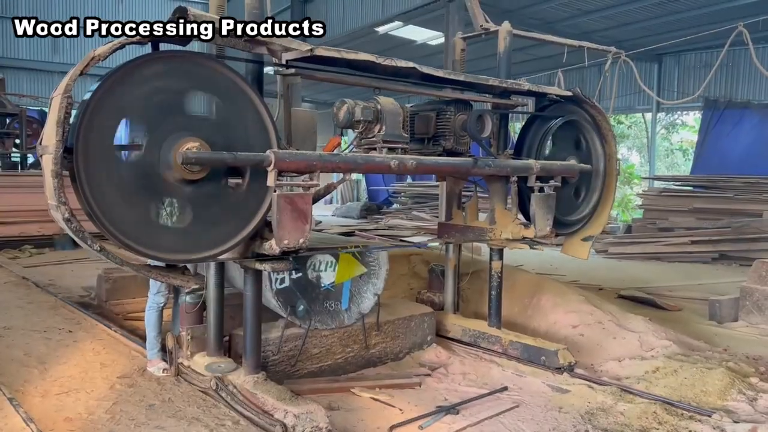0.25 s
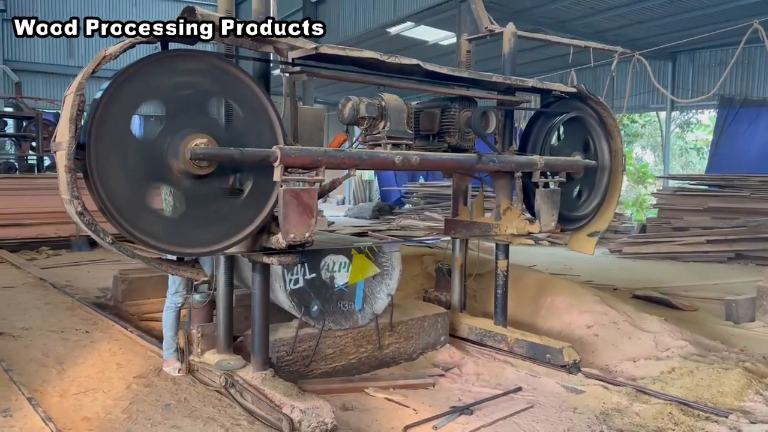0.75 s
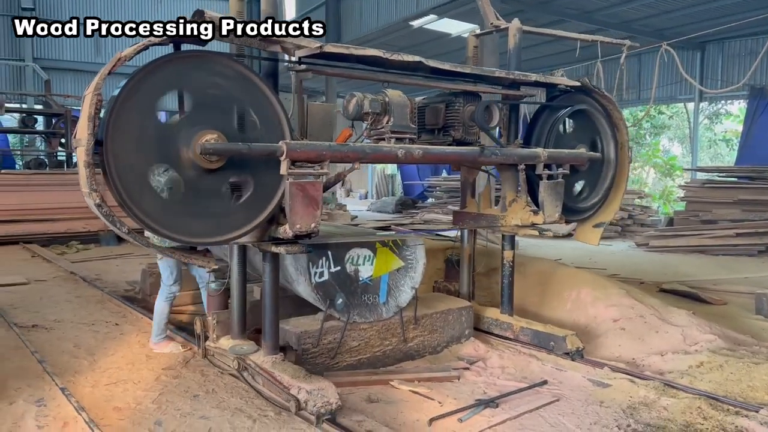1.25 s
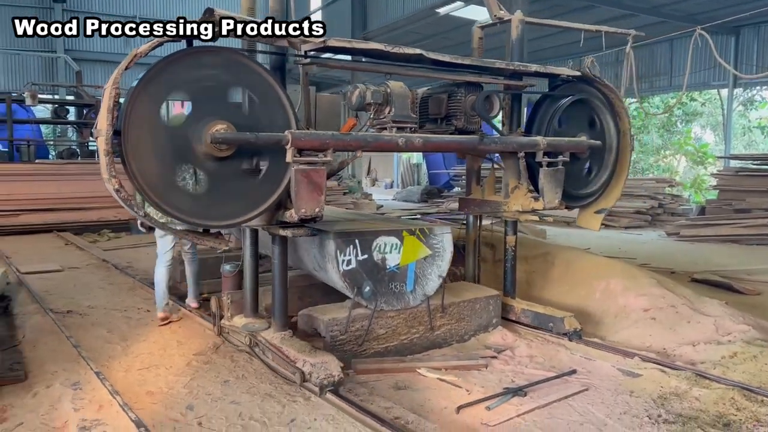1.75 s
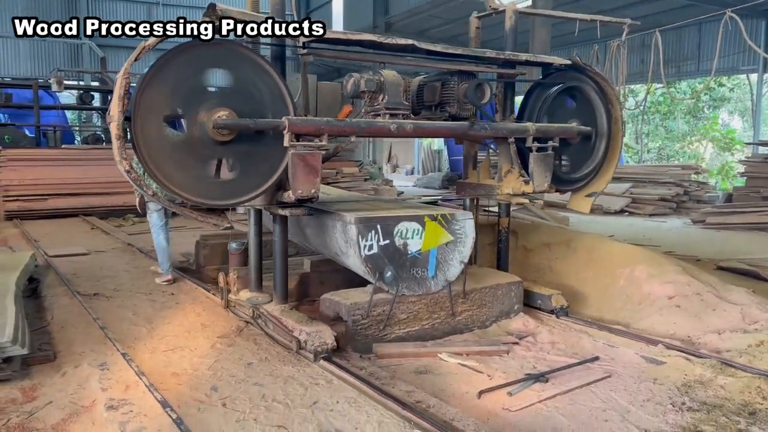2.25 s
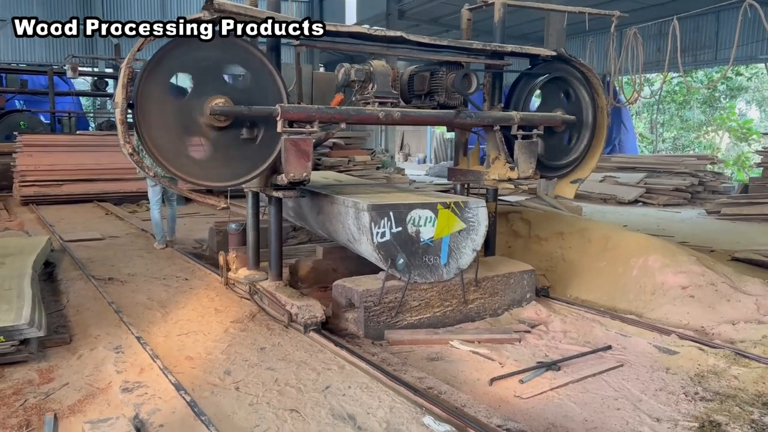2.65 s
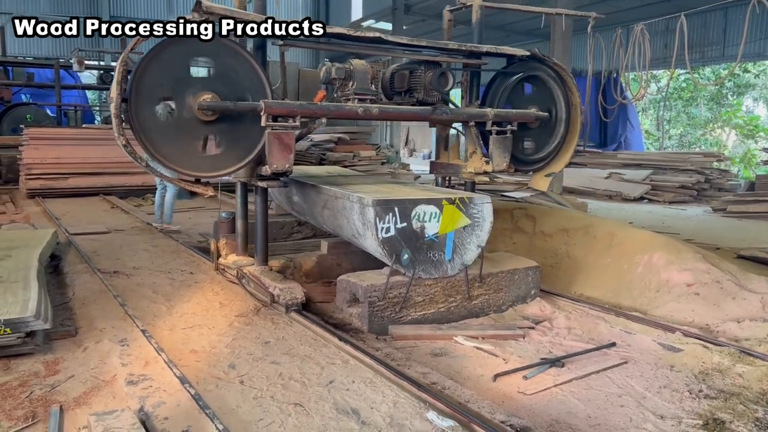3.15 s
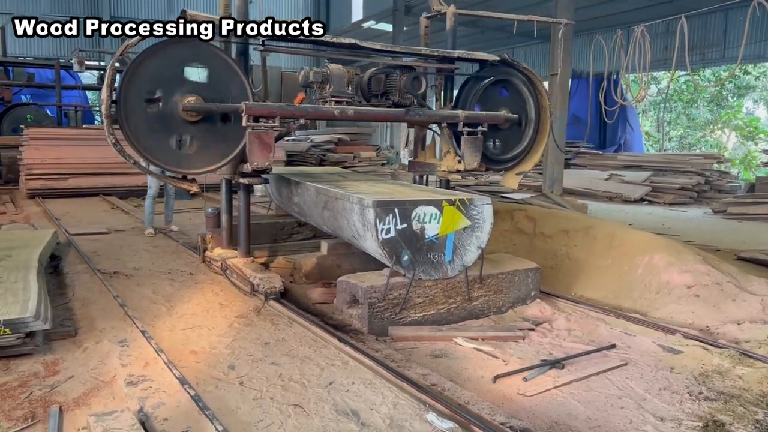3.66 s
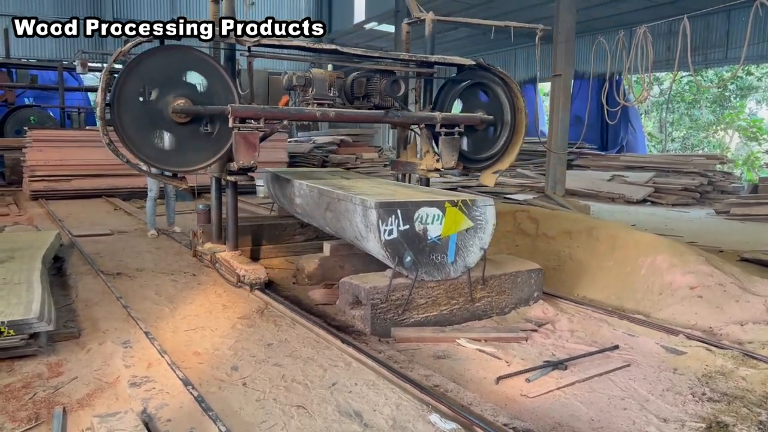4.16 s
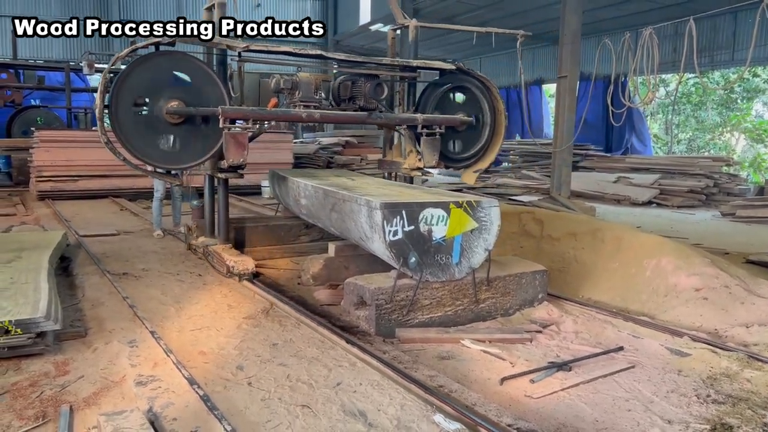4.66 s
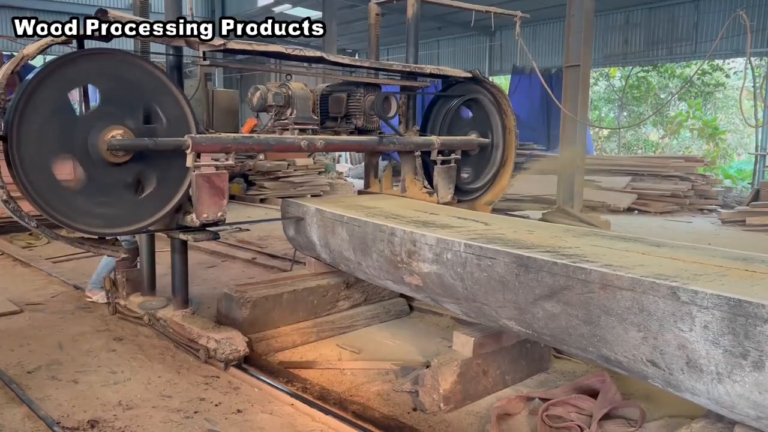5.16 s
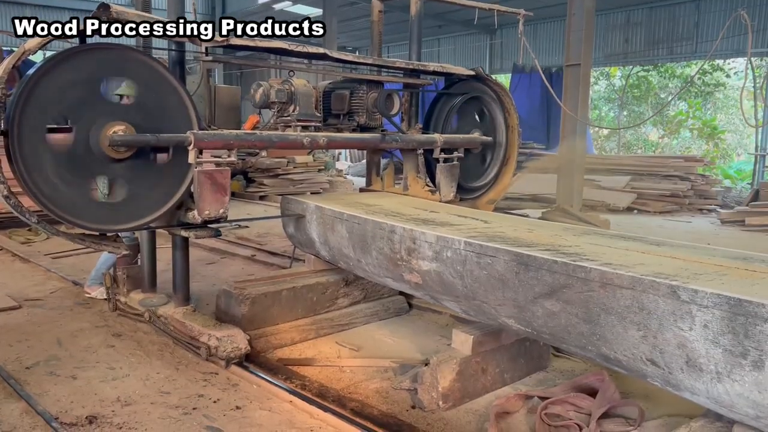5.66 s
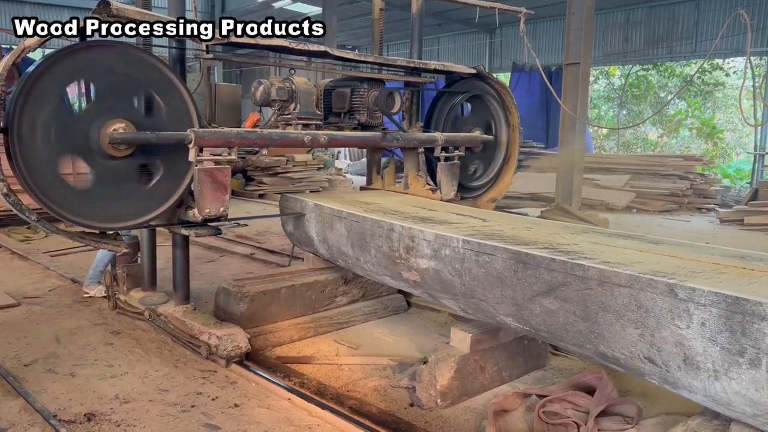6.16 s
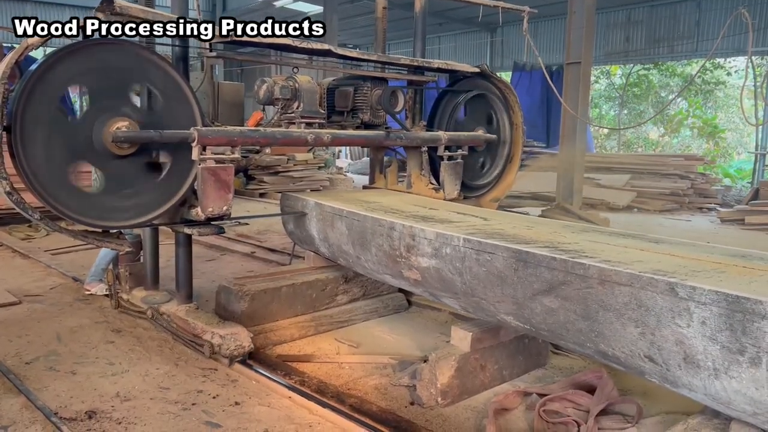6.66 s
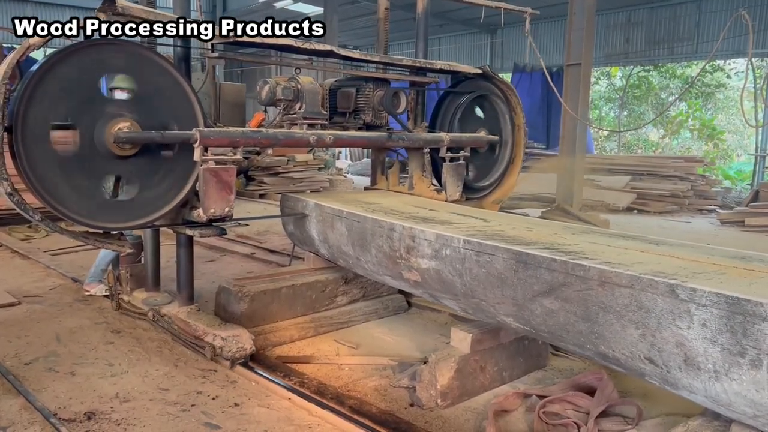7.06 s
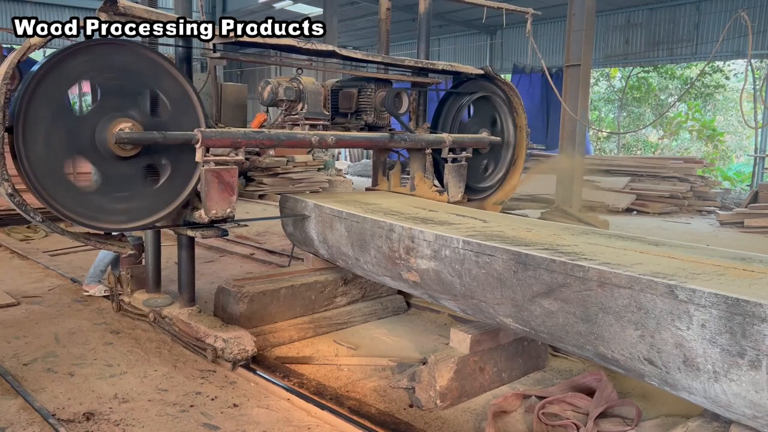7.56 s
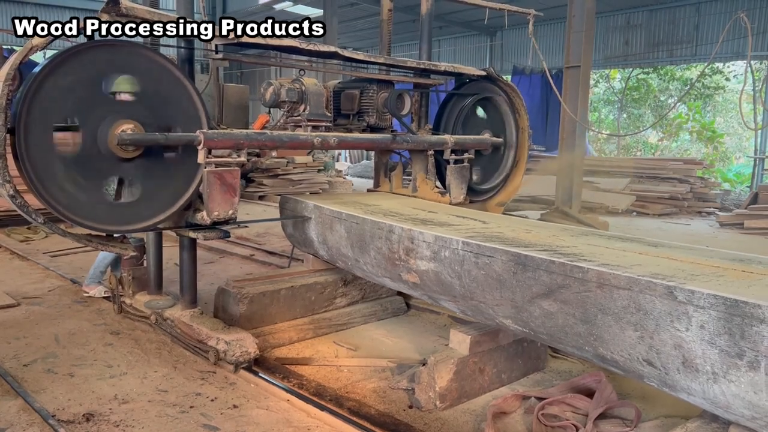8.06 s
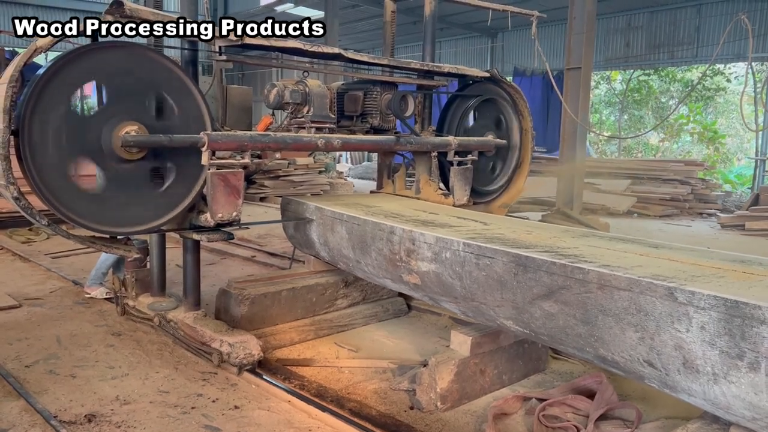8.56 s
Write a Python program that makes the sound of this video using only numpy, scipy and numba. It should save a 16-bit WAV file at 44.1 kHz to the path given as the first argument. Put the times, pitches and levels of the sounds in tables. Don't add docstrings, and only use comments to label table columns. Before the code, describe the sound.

Phone microphone near a running sawmill band saw: first in front of the big wheel, with rushing chip hiss, ringing steel, clean motor hum, small scrapes and a distant plank bouncing under a tin roof. Then a sudden cut to beside the log, where the hiss is stronger, the hum disappears, and the teeth whine at a medium-high pitch, pulsing about six times a second.

```python
import sys
import numpy as np
from scipy import signal
from scipy.io import wavfile
from scipy.ndimage import uniform_filter1d
from numba import njit

SR = 44100
rng = np.random.default_rng(int(sys.argv[2]) if len(sys.argv) > 2 else 0)


def log_audio(samples):
    frames = np.atleast_2d(samples).T
    limited = np.clip(frames, -1, 1)
    pcm = np.round(limited * 32767).astype(np.int16)
    wavfile.write(sys.argv[1], SR, pcm)


def ratio(d):
    e = np.asarray(d, float) / 20
    return 10 ** e


N = 388521
T = np.arange(N) / SR
HOP = 256
FREQ = np.arange(2 * HOP + 1) * SR / (4 * HOP)
FRAMES = np.arange(-(-N // HOP) + 1) * HOP / SR

BREAK_S, RESUME_S = 4.9287, 4.9447
QUARTER = np.array([[0], [np.pi / 2]])
WHEEL_TURN_HZ, WELD_S = 6.17, 6.9
BITE_DB = (-1, -7)

# time in seconds, level of the cut in dB.
FEED = [
    [(0, -38), (.4, -37.5), (.9, -35.5), (1.3, -37), (2.6, -36.5), (3.0, -37), (4.1, -35.5), (4.45, -37),
     (4.92, -36.5)],
    [(4.95, -30), (5.35, -29), (6.0, -30.5), (6.7, -30), (7.3, -30.5), (7.95, -30), (8.2, -30.5),
     (8.81, -30.5)],
]
# centre in seconds, half length in seconds, level in dB.
SHED_SWELLS = [(.2, .3, 2), (.9, 0.35, 3.5), (1.4, 0.18, -4.5), (1.85, .2, 1.5), (5.42, 0.1, 6.5),
               (6.05, 0.18, -2.5), (6.2, 0.07, 3), (7.7, 0.14, 1.5), (8.6, 0.76, -2), (5.0, .06, 2),
               (6.6, 0.088, -2), (8.4, 0.11, -1.5)]


def level(x, db=0):
    return x * ratio(db) / np.sqrt(np.mean(x ** 2))


def curves(tables, t):
    s, *columns = np.vstack(tables).T
    return [np.interp(t, s, c) for c in columns]


def place(pair, t):
    return np.where(t < BREAK_S, *pair)


def by_place(tables):
    fields = []
    for table in tables:
        hz, value = np.array(table).T
        fields.append(np.interp(np.log(FREQ + 1), np.log(hz), value)[:, None])
    return place(fields, FRAMES)


def swells(rows, t):
    return sum(db * np.exp(-((t - s) / half) ** 2) for s, half, db in rows)


def after(t, s, ease=0.056):
    return .5 + .5 * np.tanh((t - s) / ease)


def walk(rate, t, count=1):
    knots = rng.standard_normal((count, int(t[-1] * rate) + 3))
    return 1.198 * np.array([np.interp(t * rate, np.arange(len(k)), k) for k in knots])


def patches(rate, width_hz):
    row = np.minimum(FREQ / width_hz, 398)
    w, k = walk(rate, FRAMES, count=400), row.astype(int)
    part = (row - k)[:, None]
    return 0.8 * ((1 - part) * w[k] + part * w[k + 1])


def split(x):
    return signal.stft(x, nperseg=4 * HOP, noverlap=3 * HOP)[2]


def join(z):
    return signal.istft(z, nperseg=4 * HOP, noverlap=3 * HOP)[1][..., :N]


def unit(db, lo_hz, hi_hz):
    band_rows = (FREQ > lo_hz) & (FREQ < hi_hz)
    return db - 10 * np.log10(np.sum(ratio(db[band_rows]) ** 2, axis=0) / len(FREQ))


@njit
def resonate(push, hz, width, gain, shift):
    out, n = np.zeros(len(push)), len(push)
    for k in range(len(hz)):
        r = np.exp(-np.pi * width[k] / SR)
        p, z, g = r * np.exp(2j * np.pi * hz[k] / SR), 0j, gain[k] * np.sqrt(2 * (1 - r * r))
        for i in range(n):
            z = z * p + push[(i + shift[k]) % n]
            out[i] += g * z.imag
    return out


def ring(hz, width, db, turn_hz=0):
    hz = np.array(hz, float)
    shift, push = rng.integers(0, N, len(hz)), rng.standard_normal((2, N))
    if turn_hz:
        keep = .85
        size = int(SR / turn_hz)
        turns = np.pad(push, ((0, 0), (0, -N % size))).reshape(2, -1, size)
        turns = signal.lfilter([np.sqrt(1 - keep ** 2)], [1, -keep], turns, axis=1)
        push = turns.reshape(2, -1)[:, :N].copy()
        shift = shift % size
    return np.array([resonate(p, hz, width + 0 * hz, ratio(db), shift) for p in push])


def steel(tables, lo_hz=0., hi_hz=2e4, base_hz=2.2, damping=0.0019):
    out = []
    for table in tables:
        hz, db = np.transpose([m for m in table if lo_hz < m[0] < hi_hz])
        out.append(level(ring(hz, base_hz + damping * hz, db)))
    return place(out, T)


def wheels():
    # mode in Hz, level in dB.
    wheel_modes = [
        [(832, -52), (861, -54), (902, -54), (969, -57), (1174, -57), (1305, -45), (1386, -52), (1432, -54), (1526, -51), (1647, -51), (1752, -60), (1785, -59), (1806, -53), (1825, -53), (1881, -52), (1951, -49), (2035, -48), (2086, -53), (2191, -53), (2223, -51), (2285, -55), (2344, -54), (2363, -58), (2474, -59), (2506, -58), (2546, -52), (2614, -52), (2654, -58)] + [(1449, -51)],
        [(824, -62), (966, -57), (1303, -47), (1432, -53), (1532, -54), (1561, -53), (1647, -52), (1690, -59), (1785, -56), (1828, -52), (1881, -55), (1949, -48), (2019, -52), (2081, -50), (2099, -51), (2358, -53), (2444, -57), (2468, -54), (2603, -56)],
    ]
    wheel_db = curves(FEED, T)[0] + place((-5.5, -13), T)
    low = steel(wheel_modes, hi_hz=1291.0) * ratio(wheel_db - place((9, 16), T))
    high = steel(wheel_modes, lo_hz=1307.0, base_hz=2.4, damping=0.0018) * ratio(wheel_db + 3.5)
    return low + high


def singing_wheel():
    # centre in seconds, half length in seconds, level in dB.
    sing_swells = [(1.6, 0.3, 7), (2.4, .2, 8), (2.85, .15, 4.5), (3.15, 0.27, 11), (3.6, .15, -9),
                   (4.1, 0.22, 8), (4.45, 0.31, 9.5), (4.95, 0.15, 13), (5.65, 0.33, 14),
                   (6.15, 0.28, 13.5), (6.9, 0.38, 11)]
    sing_db = place((-51, -56), T) + swells(sing_swells, T)
    phase = 2 * np.pi * np.cumsum(1303 * (1 + 0.0011 * walk(6, T)[0])) / SR
    main = level(np.sin(phase - QUARTER) * ratio(1.5 * walk(12, T, count=2))) * ratio(sing_db)
    neighbour = level(np.sin(1.099 * phase - QUARTER) * ratio(2.5 * walk(9, T, count=2)), -44.5)
    return main + neighbour * np.clip((1.6 - T) / .1, 0, 1) * (.5 + .5 * after(T, .42))


def band():
    # mode in Hz, level in dB.
    band_low = [
        [(2724, -71), (2791, -48), (2842, -48.5), (3042, -48.5), (3077, -52), (3219, -49.5), (3257, -49),
         (3365, -49), (3510, -48.5), (3650, -58), (3669, -61), (3852, -54), (3922, -69), (3943, -51),
         (4094, -55), (4239, -58), (4325, -49), (4382, -55), (4471, -53), (4535, -51), (4686, -49.5),
         (4988, -51.5)],
        [(2786, -61), (2856, -69), (2931, -60), (2961, -53), (3068, -57), (3214, -49), (3254, -53.5),
         (3354, -50.5), (3383, -53), (3499, -51), (3644, -50.5), (3790, -53), (3938, -56), (4229, -55),
         (4317, -52), (4379, -56), (4460, -60), (4608, -50.5), (4753, -55), (4840, -57), (4904, -55),
         (4974, -52)],
    ]
    # mode in Hz, level in dB.
    band_high = [
        [(5068, -58), (5138, -55), (5211, -57), (5286, -54), (5367, -53), (5448, -52), (5512, -56), (5599, -56),
         (5674, -55), (5830, -55), (5903, -57), (5989, -59), (6062, -52), (6150, -55), (6231, -57), (6296, -56),
         (6385, -49), (6457, -56), (6527, -56), (6624, -57), (6866, -60), (6934, -61), (7009, -60), (7189, -60),
         (7265, -58), (7421, -60), (7687, -60), (7843, -62)],
        [(5128, -55), (5208, -54), (5286, -56), (5367, -59), (5451, -60), (5504, -58), (5539, -59), (5631, -60),
         (5663, -59), (5741, -57), (5817, -57), (5895, -55), (6051, -56), (6129, -53), (6185, -55), (6385, -60),
         (6506, -59), (6621, -58), (6681, -60), (6756, -61), (6936, -62), (7001, -60), (7087, -61), (7184, -60),
         (7249, -58), (7340, -60), (7410, -61), (7666, -61)],
    ]
    # centre in seconds, half length in seconds, level in dB.
    upper_swells = [
        (.9, 0.09, 4.3),
        (1.5, .15, 1.8),
        (8.0, 0.13, 2.7),
    ]
    feed_db = curves(FEED, T)[0]
    slip = after(T, 3.13, 0.26) * (T < BREAK_S)
    lower_db = feed_db + place((-6, -13), T) + 5.5 * slip * (1 - after(T, 4.33, 0.23))
    upper_db = feed_db + place((-4, -13), T) - 14 * slip + swells(upper_swells, T)
    out = steel(band_low) * ratio(feed_db + place(BITE_DB, T) - 2.0)
    out = out + steel(band_high, hi_hz=5990.0) * ratio(lower_db - 1.5)
    out = out + steel(band_high, lo_hz=5960.0) * ratio(upper_db + 1.0)
    screech = level(ring([5250., 5600., 5900.], 550.0, [0., 0., 0.]))
    return out + screech * ratio(lower_db - 4.5 + 3.0 * walk(14, T)[0])


def singers():
    # mode in Hz, start in seconds, end in seconds, level in dB.
    locked_modes = [(1438, 5, 8.81, -50), (1527, 1.5, 2.13, -46), (1530, 1.5, 1.5, -49),
                    (1647, 1, 4.9, -53), (1883, 0.6, 3.4, -53), (1953, -1, 3, -53.5), (1940, 6, 5.2, -47),
                    (2037, 0, 4.5, -52.5), (2084, -1, 1.6, -58), (2084, 8, 8.5, -51),
                    (2223, .2, .35, -47.5), (2546, 3, 4.9, -53), (2645, 5, 4, -50), (1390, 2, 4.9, -53.5),
                    (6385, -1, 1.8, -50), (5970, 3, 4.27, -48), (1432, 1.25, 1.6, -49),
                    (2226, .95, 1.33, -44.5), (5830, 3.5, 4.2, -48), (2610, 3, 3.5, -45),
                    (2546, 4.5, 3.93, -46.5), (2546, 4, 3.55, -49)]
    out = np.zeros((2, N))
    waver = np.repeat(walk(7, T[::64], count=3 * len(locked_modes)), 64, axis=1)[:, :N]
    for j, (hz, start, end, db) in enumerate(locked_modes):
        span = slice(max(int((start - .2) * SR), 0), int((end + .2) * SR))
        t = T[span]
        phase = 2 * np.pi * np.cumsum(hz + 1.5 * waver[3 * j, span]) / SR
        same_place = (t < BREAK_S) == (start < BREAK_S)
        gate = after(t, start) * (1 - after(t, end)) * same_place
        wavering = ratio(db + 2.4 * waver[3 * j + 1:3 * j + 3, span])
        out[:, span] += np.sqrt(2) * np.sin(phase - QUARTER) * wavering * gate
    return out


def chip_hiss():
    # frequency in Hz, level in dB per Hz.
    hiss_colour = [
        [(560, -33), (950, -18), (1090, -5.5), (1320, -1.5), (1550, -5), (2010, -5), (2360, -5), (3130, -1.5),
         (4140, -6.5), (5480, -7.5), (11000, -10.5), (15500, -15)],
        [(950, -11), (1150, -1), (1400, -11.5), (2000, -9.5), (2350, -6.5), (2800, -6.5), (4000, -8.5),
         (7000, -12), (9500, -11.5), (11400, -10), (11900, -5), (13600, -11.5), (15500, -9.5)],
    ]
    # time in seconds, frequency in Hz, level in dB.
    glint = [
        (1.9, 11300, 3),
        (2.55, 11200, 5.5),
        (3.2, 10800, 4.5),
        (4.2, 10600, 2.5),
        (4.9, 10500, 1),
    ]
    feed_db, hz = curves(FEED, FRAMES)[0], FREQ[:, None]
    hiss_db, bite_db = feed_db + place((-3, -3), FRAMES), feed_db + place(BITE_DB, FRAMES)
    bite = np.exp(-(np.log(hz / 3500 + 1e-9) / .5) ** 2) * (bite_db - hiss_db - place((4.5, -1.5), FRAMES))
    flicker = .75 * walk(40, FRAMES) + 1.15 * patches(45, 1800)
    flicker = flicker + 1.7 * patches(16, 100) + .2 * patches(2.5, 500)
    low_cut = 40 * np.clip(1 - hz / 950, 0, .3) / 0.17
    hiss = unit(by_place(hiss_colour), 6830, 17200) + hiss_db + bite + flicker - low_cut
    glint_hz, glint_db = curves([glint], FRAMES)
    return hiss + glint_db * np.exp(-((hz - glint_hz) / 450) ** 2) * (FRAMES < BREAK_S)


def shed_rumble():
    # frequency in Hz, level in dB per Hz.
    rumble_colour = [
        [(35, -61), (60, -38), (129, -9.5), (258, -6.5), (355, -6), (652, -4), (782, -7.5), (884, -3.5),
         (1100, -11), (1430, -47), (2420, -120)],
        [(35, -68), (60, -39), (211, -23.5), (244, -24), (482, -15), (537, -11.5), (699, -18.5), (797, -8),
         (966, -20), (1050, -41), (1360, -32), (2310, -120)],
    ]
    shed_db, hz = swells(SHED_SWELLS, FRAMES), FREQ[:, None]
    rumble_db = place((-40.5, -46), FRAMES) + 0.56 * shed_db
    deep_db = place((-46.5, -50), FRAMES) + 0.64 * shed_db
    deep = np.clip(np.log2(320 / (hz + 1)) + .5, 0, 1)
    colour = by_place(rumble_colour)
    rumble = deep * (unit(colour, 90, 300) + deep_db) + (1 - deep) * (unit(colour, 220, 1200) + rumble_db)
    return rumble + 1.5 * patches(9, 100) - 60 * (hz > 1080)


def cut():
    gain = np.hypot(ratio(chip_hiss() + 2.5), ratio(shed_rumble() + 1.3))
    return join(split(rng.standard_normal((2, N))) * gain)


def kerf_ring(second_db, throb):
    # mode in Hz, width in Hz, level in dB, drift in dB per second.
    kerf_modes = [
        [(1060, 9.1, -12, 3.5), (1105, 12, 4, -2.5), (1130, 8.2, -3, 2), (1160, 12, -5, 2),
         (1200, 12, -7.5, -7), (1241, 9.2, -9, 3.5)],
        [(2197, 54, -5.5, -1), (2223, 50, -0.5, -0.5), (2262, 22, -1, 2.5), (2355, 59, -5.5, -3.5)],
    ]
    out = 0
    for db, modes in zip((second_db - 13, second_db), kerf_modes):
        body = 0
        for hz, width, mode_db, drift in modes:
            mode = ring([hz], width, [0.], turn_hz=WHEEL_TURN_HZ)
            body = body + level(mode, mode_db + 10 * np.log10(width)) * ratio(drift * (T - WELD_S))
        out = out + level(body * (T > BREAK_S), -5.0) * ratio(db) * throb
    return out


def weld_knock(second_db, turn):
    # mode in Hz, width in Hz, level in dB against the teeth.
    weld_modes = [
        (1200, 30, -3.5),
        (2345, 70, -1),
        (2270, 40, -6),
    ]
    since = (turn / (2 * np.pi) + .43) % 1 - .5
    knock = ring(*np.transpose(weld_modes), turn_hz=WHEEL_TURN_HZ) * np.exp(-(since / 0.066) ** 2)
    return knock * ratio(second_db)


def teeth():
    # time in seconds, level in dB.
    teeth_level = [
        (4.95, -34.5),
        (5.3, -33.5),
        (5.55, -36.5),
        (6.1, -35.5),
        (6.6, -36.5),
        (7.0, -35.5),
        (7.7, -37),
        (8.2, -34.5),
        (8.81, -36.5),
    ]
    # centre in seconds, half length in seconds, level in dB.
    whine_swells = [
        (5.55, .4, 2),
        (6.17, .04, -12),
        (6.5, .25, -1),
        (7.8, .25, 1),
        (8.75, .2, -4),
    ]
    tooth_hz, swing_hz, dip_db = 1107, 16, 3
    second_db = curves([teeth_level], T)[0] - 1.0
    wobble = 2 * np.pi * 6.22 * (T - 6.985)
    sway = -np.cos(wobble + .3 * walk(2, T)[0])
    grown = .35 + (1 - .35) * after(T, 6.35, .3)

    first_hz = tooth_hz + swing_hz * (grown * sway - .3 * (1 - grown)) + 2 * walk(20, T)[0]
    first = np.sin(2 * np.pi * np.cumsum(first_hz) / SR - QUARTER)
    first = first * ratio(-dip_db * sway + 2 * walk(25, T, count=2))
    whine_db = .4 * (second_db + 37) + swells(whine_swells, T) + 2 * np.cos(2 * wobble)
    out = level(first, -42.5) * ratio(whine_db)

    turn = 2 * np.pi * WHEEL_TURN_HZ * (T - WELD_S)
    throb = 1 + .2 * np.cos(turn - 2) + .14 * np.cos(3 * turn - .4)
    throb = throb + .25 * np.cos(4 * turn - .8) + .1 * np.cos(7 * turn + 1.7)
    second_hz = 2 * tooth_hz + 2 * swing_hz * sway * np.sqrt(grown) + 9 * walk(30, T)[0]
    second = np.sin(2 * np.pi * np.cumsum(second_hz) / SR - QUARTER)
    second = second * ratio(-dip_db * sway + 4 * walk(40, T, count=2))
    out = out + level(second, -4.5) * ratio(second_db) * throb
    out = out + kerf_ring(second_db, throb) + weld_knock(second_db, turn)
    return out * (T > BREAK_S)


def motor():
    # order of the turn, level in dB.
    hum_orders = [(7, -1), (9, -11), (11, 0), (12, -9), (13, -7), (14, -4), (15, -6), (16, 2.5), (17, -1),
                  (18, 2.5), (19, -11), (22, -3), (23, -2), (24, -4)]
    # order, centre in seconds, half length in seconds, level in dB.
    order_swells = [(7, 2.15, 0.14, 6), (7, 3.64, 0.23, 5.5), (7, 0.14, 0.4, 11.5), (14, 2.04, 0.45, 8),
                    (14, .5, .4, 13), (15, 3.55, 0.37, 5), (16, 4.4, 0.74, 2), (16, 0.31, .5, 7),
                    (17, 2.34, .25, 7), (17, 4.6, .25, 6.5), (18, 2.9, 0.58, 3), (18, 4.2, .3, -7),
                    (11, 0.18, 0.068, -16), (11, 0.78, 0.073, -13), (11, 0.32, .05, 0.5),
                    (11, 0.87, .06, 1.5), (11, 0.65, .06, 3), (11, 0.46, .05, -2), (11, 1.4, .2, -4),
                    (11, 1.66, .08, 5), (11, 2.15, .05, -10), (11, 2.75, 0.045, -7), (11, 3.8, .1, -9),
                    (11, 2.05, .05, 1), (11, 2.55, .15, -0.5), (11, 3.2, 0.21, 4), (11, 3.61, 0.12, 5),
                    (18, 3.9, .1, -4), (16, 2.76, .1, -5), (16, 3.8, .1, -2), (18, 1.96, .15, -5),
                    (7, 4.9, .3, 3.5)]
    back_s = 1.73
    back_db = 8 - 4 * (T - back_s)
    strongest_db = -40.5 - 12.5 * after(T, 1) + back_db * after(T, back_s)
    others_db = -54 + 10 * after(T, 1.6, 0.17)
    turn = 2 * np.pi * np.cumsum(37.38 * (1 + 0.0014 * walk(3.01, T)[0])) / SR
    drift = walk(5, T[::64], count=24)
    start = rng.uniform(0, 2 * np.pi, (24, 1, 1)) - QUARTER
    out = 0
    for j, (k, db) in enumerate(hum_orders):
        k = round(k)
        own_db = swells([row[1:] for row in order_swells if round(row[0]) == k], T)
        base_db = strongest_db + 1.0 + 1.3 * walk(23.9, T)[0] if k == 11 else others_db - 7.0
        order_db = base_db + db + own_db + 2.4 * np.repeat(drift[j], 64)[:N]
        out = out + ratio(order_db) * np.sqrt(2) * np.sin(k * turn + start[j])
    return out * (T < BREAK_S)


def noise_bursts():
    # centre in seconds, half length in seconds, frequency in Hz, width in Hz, level in dB.
    bursts = [(.372, 0.013, 3500, 2600, -29), (.389, 0.0047, 4300, 2400, -27), (.41, .016, 3100, 900, -34),
              (.272, .005, 6000, 1400, -34), (.845, .015, 1600, 560, -34), (0.81, .04, 1950, 110, -39),
              (0.91, 0.022, 5600, 1700, -30.5), (4.08, 0.1, 4510, 200, -38), (4.03, .025, 4300, 990, -35),
              (1.6, .02, 1400, 600, -34), (0.12, 0.055, 507, 30, -37), (0.039, 0.035, 1920, 150, -37.5),
              (5.46, 0.052, 210, 220, -40.5), (7.68, 0.047, 230, 210, -43), (3.6, 0.023, 1275, 30, -43),
              (1.764, .008, 690, 160, -37), (1.645, 0.01, 915, 60, -31), (1.63, 0.04, 2200, 2200, -35.5),
              (1.622, .012, 340, 60, -33), (1.875, .012, 580, 74, -36), (0.7, .04, 1520, 300, -37),
              (3.03, 0.32, 2040, 300, -41.5), (4.03, .06, 2050, 200, -40)]
    out = np.zeros(N)
    for s, length, hz, width, db in bursts:
        sos = signal.butter(2, [hz - width / 2, hz + width / 2], "band", fs=SR, output="sos")
        rasp = signal.sosfilt(sos, rng.standard_normal(N))
        out += level(rasp, db) * np.exp(-((T - s) / length) ** 4)
    return out


def plank():
    # start in seconds, level in dB, dullness (above 0 favours the low modes, below 0 the high ones).
    blows = [
        (1.584, -27, 0),
        (1.594, -30.5, 0),
        (1.607, -30, 0),
        (1.617, -27.5, 1.2),
        (1.64, -28.5, 0),
        (1.664, -30, -0.2),
        (1.69, -31, .6),
        (1.738, -32, 0),
        (1.75, -34, 0),
        (1.873, -33, 0.3),
    ]
    # mode in Hz, time to fall 60 dB in seconds, level in dB.
    plank_modes = [
        (332, 0.11, -6.5),
        (453, 0.088, -4),
        (684, 0.08, -9),
        (926, 0.055, 0.5),
        (1005, .04, -8),
        (1290, 0.05, -9),
        (1505, 0.04, -12),
        (1890, .04, -12),
    ]
    hz, t60, mode_db = np.transpose(plank_modes)
    out, t = np.zeros(N), T[:SR // 3, None]
    for s, db, dull in blows:
        size = ratio(db + mode_db - 12.0 * dull * np.log2(hz / 500))
        body = (size * np.exp(-np.log(1000) * t / t60) * np.sin(2 * np.pi * hz * t)).sum(axis=1)
        noise = level(ring([1300.], 1500.0, [0.])[0], db)
        slap = noise[int(s * SR):][:len(t)] * np.exp(-t[:, 0] / 0.016)
        out[int(s * SR):][:len(t)] += (body + slap) * np.minimum(t[:, 0] / .003, 1)
    return out


def shed(x):
    t, t60_s = T[:SR], 0.52
    tail = rng.standard_normal((2, SR)) * np.exp(-np.log(1000) * t / t60_s) * (t > .008)
    wet = signal.fftconvolve(x[None], tail / np.sqrt(np.sum(tail[0] ** 2)), axes=1)[:, :N]
    return np.array([.9 * x + .4 * wet[0], .8 * wet[1] + .5 * np.roll(x, 300)])


def yard():
    knocks = plank() + noise_bursts()
    return shed(signal.sosfilt(signal.butter(2, 220, "high", fs=SR, output="sos"), knocks))


def scene():
    # frequency in Hz, likeness of the ports (held between 0 and 0.99 when read).
    port_likeness = [
        [(200, 0.85), (800, 0.9), (1550, 0.34), (2200, 0.64), (4300, 0.36), (6000, .5), (8000, 0.25),
         (15000, 0.5)],
        [(200, 0.58), (700, 0.16), (1050, 0.73), (2300, 0.5), (4300, 0.17), (8100, 0.5), (12000, 1),
         (13800, -1), (15200, -3)],
    ]
    # frequency in Hz, lead of the left port in radians.
    port_lead = [
        [(1000, 0), (6000, .3), (12000, -1.3)],
        [(2200, 0), (4300, .7), (6000, 0), (8100, -2.3), (10000, -1.5), (12000, 0), (15200, 1.9)],
    ]
    # frequency in Hz, left minus right in dB.
    port_tilt = [
        [(200, -1), (1000, -1.5), (6000, -4), (12000, -3), (15200, 6)],
        [(200, 0.5), (1500, -2.5), (6000, -2.5), (14000, -1.5)],
    ]
    saw = wheels() + singing_wheel() + band() + singers()
    direct, scattered = split(saw + cut() + teeth() + motor() + yard())
    like, lead = np.clip(by_place(port_likeness), 0, .99), by_place(port_lead)
    tilt = ratio(by_place(port_tilt) / 2)
    right = like * np.exp(-1j * lead) * direct + np.sqrt(1 - like ** 2) * scattered
    lift = np.sqrt(2 / (1 + like * np.cos(lead)))
    return join(np.array([direct * tilt, right / tilt]) * lift)


def roll_off(x):
    return signal.sosfilt(signal.butter(12, 15900, fs=SR, output="sos"), x)


def record(dry):
    # centre in seconds, half length in seconds, frequency in Hz.
    dropouts = [(5.0, .04, 720), (5.27, .05, 450), (5.27, .02, 150), (5.72, .06, 660), (6.04, .07, 420),
                (6.33, .04, 690), (6.48, .025, 300), (6.58, .04, 140), (6.74, .03, 380), (7.0, .06, 720),
                (7.12, .025, 320), (7.18, .05, 700), (7.35, .05, 540), (7.46, .02, 280), (7.88, .04, 420),
                (8.1, .03, 350), (8.17, .04, 620), (8.38, .06, 140), (8.56, .04, 670), (8.72, .05, 420)]
    top_hz, hz = 15700, FREQ[:, None]
    z = split(dry)
    weak = (hz < 880) & (FRAMES > BREAK_S)
    power = np.mean(np.abs(z) ** 2, axis=0)
    power = uniform_filter1d(uniform_filter1d(power, size=2, axis=0), size=3)
    over_db = 10 * np.log10(power / np.median(power[weak])) + 7 * patches(36, 70)
    over_db = over_db + (1.5 * swells(SHED_SWELLS, FRAMES) - 3) * (hz < 150)
    over_db = over_db + 4 * np.exp(-((hz - 200) / 60) ** 2)
    for s, half, centre_hz in dropouts:
        over_db = over_db - 14 * np.exp(-((FRAMES - s) / half) ** 2 - ((hz - centre_hz) / 65) ** 2)
    drop_db = -36 * np.clip((1 - over_db) / 1.5, 0, 1)
    faint = place((hz > 12800, (np.abs(hz - 10700) < 800) * .2), FRAMES)
    speck_db = -26 * (patches(20, 190) > 1.15) * faint
    wet = join(z * ratio(weak * drop_db + speck_db) * (hz < top_hz + 80))
    wet = signal.sosfilt(signal.butter(2, 95, "high", fs=SR, output="sos"), wet)
    wet = signal.sosfilt(signal.ellip(12, .3, 70, top_hz, fs=SR, output="sos"), wet)
    wet = wet * np.where((T > BREAK_S) & (T < RESUME_S), ratio(-12), 1)
    return roll_off(wet)


dry = scene()
out = record(dry)
log_audio(out)
```